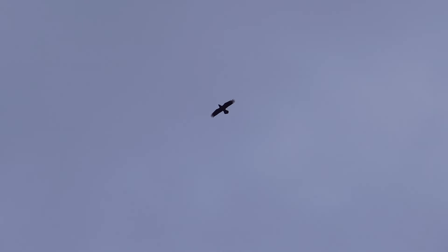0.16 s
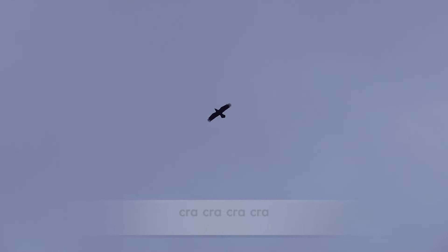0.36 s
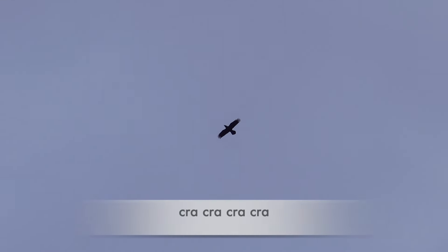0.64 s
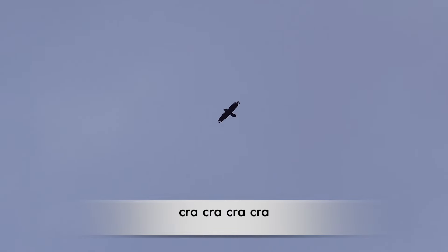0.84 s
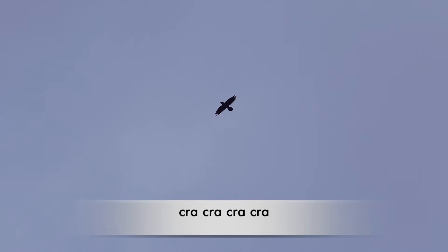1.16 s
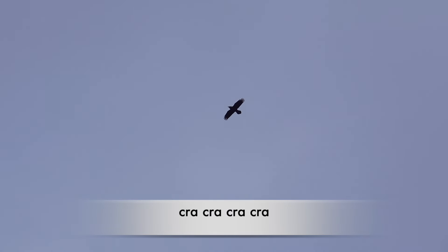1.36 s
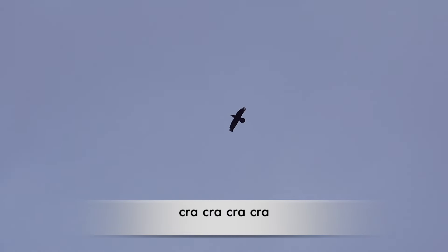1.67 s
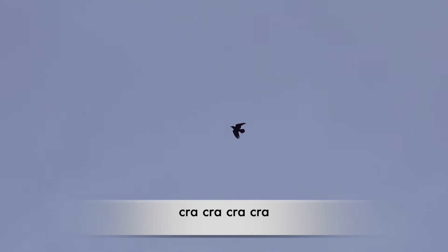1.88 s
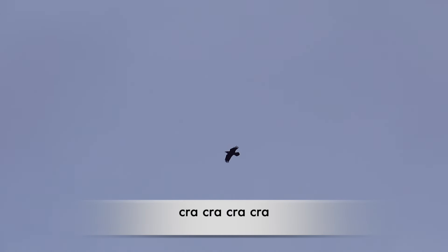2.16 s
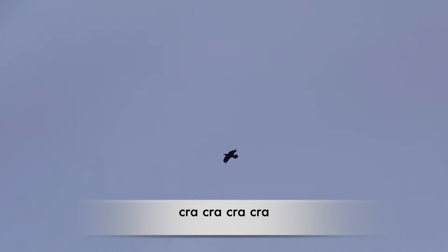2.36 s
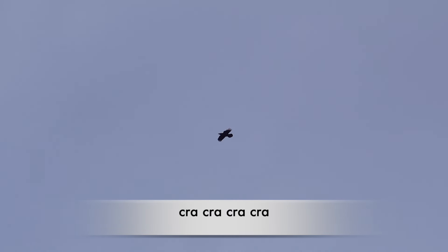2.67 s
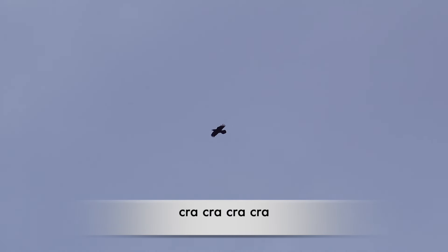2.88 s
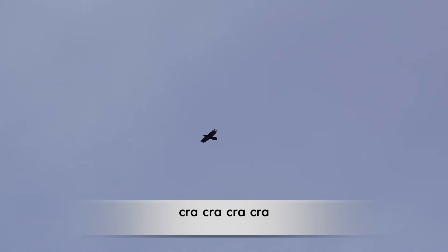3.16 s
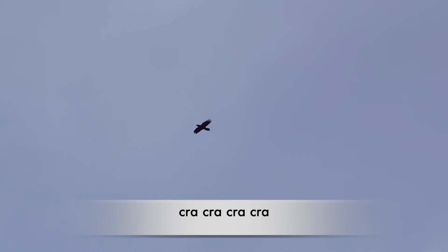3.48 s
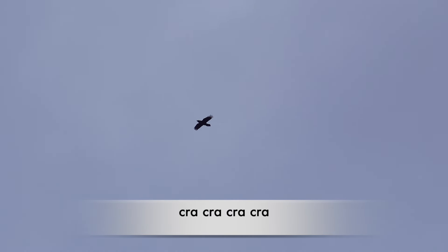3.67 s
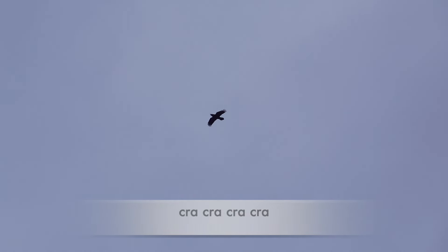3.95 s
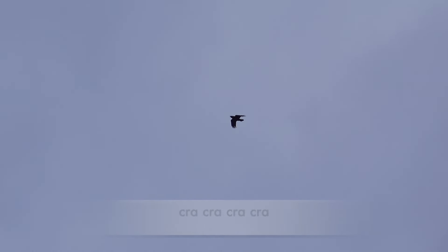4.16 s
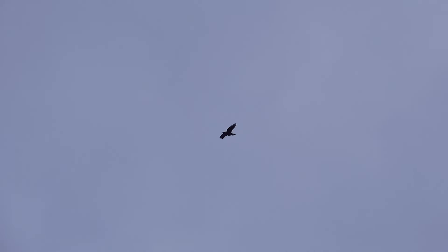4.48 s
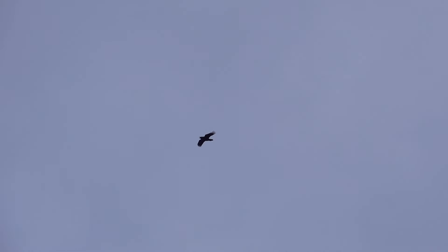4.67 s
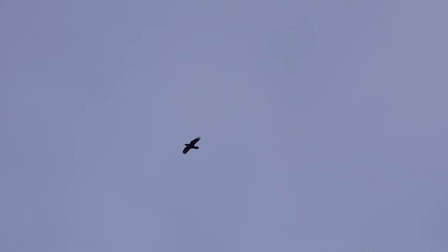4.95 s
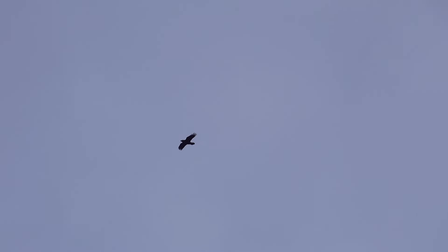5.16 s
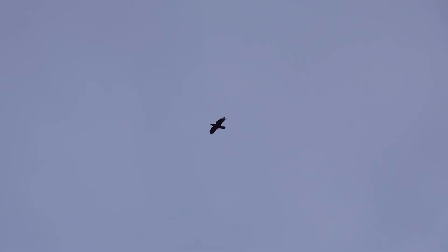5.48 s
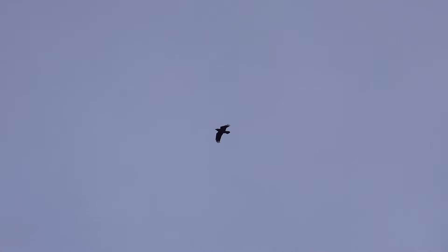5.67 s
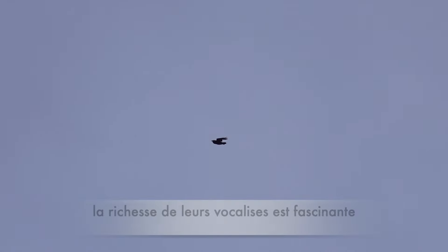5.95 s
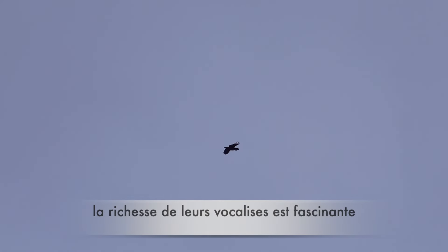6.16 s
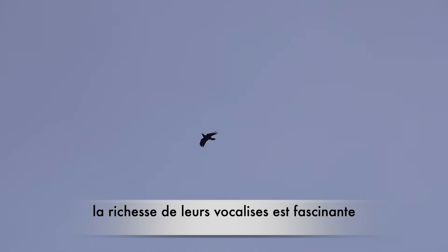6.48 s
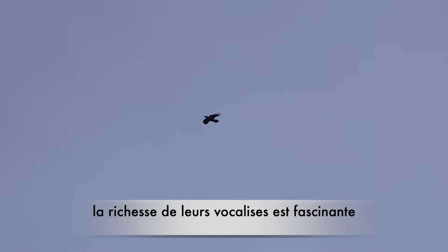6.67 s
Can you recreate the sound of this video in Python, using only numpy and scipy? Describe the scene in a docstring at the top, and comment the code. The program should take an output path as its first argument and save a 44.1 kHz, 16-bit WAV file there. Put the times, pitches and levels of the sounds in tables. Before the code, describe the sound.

Open air, handheld camera microphone, bird at some distance overhead. After a second of faint wind and dull handling thuds come four grating raven calls, each a tiny click and three rapid throbs dropping in pitch. Handling bumps and housing ticks fill the gap, with barely audible thin cries far off. Five softer, less raspy calls end the scene, the last harsher again.

```python
"""Outdoors, under a raven: two runs of short harsh calls, four and then five, each with a faint echo.
Each call is a click and three throbs of the syrinx: pulses and puffs of air pass through throat and rasp
resonances, a third harmonic whistles between throbs, and the pitch slides down at the end.
Close by, hands bump the camera (decaying low modes and dull noise) and its housing ticks (filtered bursts).
Behind lie a fading wash of distant wind, a rumble, a few thin far-off cries and a hiss, all shaped noise."""
import sys
import numpy as np
from scipy import signal
from scipy.fft import rfft, irfft, next_fast_len
from scipy.io import wavfile
from scipy.ndimage import uniform_filter1d, map_coordinates

SR = 44100
rng = np.random.default_rng(int(sys.argv[2]) if len(sys.argv) > 2 else 0)


def master(y):
    """Save y as 16-bit WAV."""
    cut = np.clip(np.atleast_2d(y).T, -1, 1)
    pcm = np.round(cut * 32767)  # scale
    wavfile.write(sys.argv[1], SR, pcm.astype(np.int16))


N = 300877  # length in samples

# The raven's calls. Each row: first throb in seconds, throb period in seconds, pitch in Hz,
# voice level in dB before a 4 dB cut, rasp level in dB before a 5 dB cut, chest gain in dB,
# open-beak gain in dB, edge gain of the rasp in dB, lead-in gain in dB, lead-in rasp gain in dB,
# swell in dB per throb, harshest moment in seconds after the first throb.
CALLS = [(1.051, .02, 427.7, -27.5, -32.5, 6, 1, -4.5, 2.5, 3.5, -2, .003),
         (1.376, .021, 433.7, -25.3, -35.5, 4, 4.5, 8.5, -9.5, -3, 1, .003),
         (1.755, 0.022, 435.7, -29, -36.5, 3.5, 1, -6.5, -9, 1.5, 0, .012),
         (2.114, 0.021, 429.3, -29.5, -35.5, 4, 3.5, 0, -12, -11.5, 0.5, .003),
         (5.159, 0.021, 423.7, -34.5, -40, -2, 2, -23, -22.5, -7, -0.5, 0.027),
         (5.467, .021, 419.4, -28, -36.5, -1, 0.5, -32, -7, -7.5, 0, 0.0134),
         (5.79, .0215, 429.8, -34.8, -41, 5.5, -3.5, -30, -3.5, 5, -0.5, .003),
         (6.142, .02, 422.6, -32, -45, -2.5, -10.5, -10.5, -14, -2, -0.5, .022),
         (6.506, 0.021, 423.6, -32.5, -33, -7.5, 4.5, 4.5, -16, -6, 2.5, 0.008)]

# One throb of the syrinx: it tightens, holds and slackens.
ATTACK_S, HOLD_S, RELEASE_S = 0.0022, 0.008, 0.006
# A slack syrinx croaks and rasps less and whistles more; the croak and rasp dips fill with each throb.
CROAK_DIP_DB, RASP_DIP_DB, WHISTLE_DIP_DB = 9, 8, 10.5
DIP_FILL_DB, WHISTLE_GROWS_DB = 4, 0.5  # per throb
# The rasp falls during each throb, and also on both sides of the call's harshest moment.
RASP_DROP_DB_PER_S, RASP_ARCH_DB_PER_S = 399, 101
# Once the last throb's period is over, croak, rasp and whistle fade.
CROAK_FADE_DB_PER_S, RASP_FADE_DB_PER_S, WHISTLE_FADE_DB_PER_S = 801, 351, 997.5
# Share of the pitch lost when slack, share lost in the closing slide, and time constant of that slide.
SAG, SLIDE, SLIDE_S = 0.145, 0.21, 0.006
WAVER, WAVER_S = 0.014, 0.012  # unsteady pitch: rms share, time between turns
# The lead-in: a click ahead of the first throb that sinks to a murmur.
LEAD_S, LEAD_RISE_DB_PER_S, LEAD_FALL_DB_PER_S = 0.0145, 8500.5, 2600.5
MURMUR_DB, LEAD_WHISTLE_DB = -17, -5.5
# The beak is widest in mid-call: time after the first throb, half width,
# and the edge of the rasp gained when wide and lost when narrow.
GAPE_AT_S, GAPE_S, WIDE_DB, NARROW_DB = 0.025, 0.029, 5.5, 4
# Faint nudges: low-mode peak at the start, its spread either way, and how it grows.
NUDGE_DB, NUDGE_SPREAD_DB, NUDGE_GROWTH_DB_PER_S = -51.5, 5.5, 0.06
NUDGE_KNOCK_DB = -10.5  # before the lift all knocks get
KNOCK_LIFT_DB = 8.5
TOP_HZ = 15750  # upper band limit of the camera


def amp(db):
    """Decibels to gain."""
    return 10 ** (np.asarray(db) / 20)


def unit(x):
    """Scaled to rms 1."""
    return x / np.sqrt(np.mean(x ** 2) + 1e-20)


def along(points, hz):
    """(Hz, value) points read on a log frequency axis."""
    f, v = np.transpose(points)
    return np.interp(np.log(hz + 1), np.log(f + 1), v)


def wobble(rate):
    """A smooth random curve, rate knots a second."""
    knots = rng.standard_normal(int(N * rate / SR) + 4)
    coarse = np.arange(0, N, 64)
    curve = map_coordinates(knots, [coarse * rate / SR])
    return np.interp(np.arange(N), coarse, curve)


def coloured(x, points):
    """x through a causal minimum-phase filter with the gain of the (Hz, dB) points."""
    n = x.shape[-1]
    m = 2 * next_fast_len(n)
    gain = amp(along(points, np.fft.rfftfreq(m, 1 / SR)))
    # folding the cepstrum onto positive times makes the filter causal
    cepstrum = irfft(np.log(gain), m)
    cepstrum[1:m // 2] *= 2
    cepstrum[m // 2 + 1:] = 0
    response = np.exp(rfft(cepstrum))
    return irfft(rfft(x, m) * response, m)[..., :n]


def noise(points):
    """Noise of rms 1 with the colour of the (Hz, dB) points."""
    m = next_fast_len(N, real=True)
    gain = amp(along(points, np.fft.rfftfreq(m, 1 / SR)))
    return unit(irfft(rfft(rng.standard_normal(m)) * gain, m)[:N])


def patchy(x, depth_db):
    """x with smooth random gains over time and frequency, scaled to rms 1."""
    z = signal.stft(x, nperseg=512)[2]
    field = rng.standard_normal(z.shape)
    field = uniform_filter1d(field, size=5, axis=0)
    field = uniform_filter1d(field, size=7, axis=1)
    return unit(signal.istft(z * amp(depth_db * unit(field)), nperseg=512)[1][:N])


def air():
    """Lumpy distant wind dies down over an uneven rumble and a hiss that is wide in the treble."""
    # Colours of the wind, the rumble and the hiss. Each row: frequency in Hz, gain in dB.
    wind_colour = [(15, -27), (30, -10), (55, -12.5), (140, -9), (300, 0.5), (550, 5.5), (750, 3.5),
                   (900, 0.5), (1020, -7), (1300, -32), (2200, -30.5), (8000, -72)]
    rumble_colour = [(20, -9), (55, -17), (90, -6.5), (145, -2), (250, -6), (500, -23), (1500, -62.5)]
    hiss_colour = [(20, 9), (150, 11), (700, 15), (1050, 22.5), (1300, 13), (2500, 5), (4000, 2.5),
                   (7000, -0.5), (11000, -1), (14000, 0.5), (15700, -2.5)]
    # Wind level. Each row: time in seconds, level in dB before a 2 dB lift.
    wind_course = [(0.0, -48.5), (0.74, -53), (0.85, -50.5), (1.56, -56), (2.55, -66), (3.84, -71.5),
                   (5.15, -70.5), (5.3, -69.5), (6.82, -70.5)]
    # Hiss level. Each row: time in seconds, level in dB before a 9 dB lift (middle) or 1.5 dB cut (sides).
    hiss_course = [(0.0, -73), (1.12, -77.5), (3.06, -81), (3.48, -82), (5.19, -83.5), (5.43, -78.5),
                   (6.82, -79.5)]
    t = np.arange(N) / SR
    wind_db = np.interp(t, *np.transpose(wind_course))
    hiss_db = np.interp(t, *np.transpose(hiss_course))
    wind = amp(wind_db + 2.0 + 0.66 * wobble(11)) * patchy(noise(wind_colour), depth_db=4.0)
    rumble = amp(-71 + 4 * wobble(25)) * noise(rumble_colour)
    hiss = amp(hiss_db + 9.0) * noise(hiss_colour)
    # white noise of opposite sign left and right
    side = amp(hiss_db - 1.5) * rng.standard_normal(N)
    return wind + rumble + hiss + np.array([side, -side])


def nudges(count=18):
    """Faint shifts of the grip, loosely spread in time: rows like those of the firm bumps."""
    chance = rng.random((count, 2))
    times = (np.arange(count) + chance[:, 0]) / count * (N / SR - 0.1) + 0.05
    levels = NUDGE_DB + NUDGE_GROWTH_DB_PER_S * times + NUDGE_SPREAD_DB * (2 * chance[:, 1] - 1)
    return [(s, db, NUDGE_KNOCK_DB) for s, db in zip(times, levels)]


def bumps():
    """Soft pushes of the hand swell in the camera body's low modes, with a dull rubbing knock."""
    # Firm bumps. Each row: time in seconds (onset 6 ms earlier), low-mode peak in dB,
    # knock relative to it in dB before the knock lift.
    firm = [(0.445, -39, -10.5), (0.817, -44.5, -14), (1.548, -36.5, -8), (1.595, -43, -5.5),
            (1.995, -42, -13.5), (2.055, -43.5, -10.5), (2.201, -45, -14), (2.389, -44, -15),
            (2.477, -39, -14.5), (2.654, -42.5, -7.5), (2.843, -35, -13), (3.025, -36, -10.5),
            (3.574, -39.5, -20), (3.628, -46.5, -19.5), (3.751, -42.5, -18), (3.795, -43, -21),
            (3.914, -41.5, -11), (4.243, -45.5, -25.5), (4.458, -50.5, -13.5), (4.705, -48, -16),
            (5.172, -41, -8.5), (5.24, -51.5, 2), (5.336, -40, -9), (5.934, -47, -19), (6.121, -48.5, -9.5),
            (6.302, -52.5, -13)]
    # Modes of the camera body. Each row: frequency in Hz, 60 dB decay time in seconds, level in dB.
    body_modes = [(143.2, 0.12, 1.5), (86, 0.089, -9)]
    # Colour of the knock. Each row: frequency in Hz, gain in dB.
    knock_colour = [(20, -12.5), (60, -14), (120, -10), (220, 3), (320, -6), (600, -27.5), (1500, -32),
                    (4000, -60.5)]
    out = np.zeros(N + SR)
    t = np.arange(SR // 7) / SR
    swell = 1 - np.exp(-(t / 0.012) ** 2)
    for s, db, knock_db in list(firm) + nudges():
        ring = np.zeros(len(t))
        for hz, t60, level_db in body_modes:
            detuned_hz = hz * rng.normal(1, 0.0053)
            ring += amp(level_db - 60 * t / t60) * np.sin(2 * np.pi * (detuned_hz * t + rng.random()))
        ring *= swell
        knock = coloured(rng.standard_normal(len(t)) * swell * amp(-60 * t / 0.1), knock_colour)
        ring /= np.abs(ring).max()
        knock *= amp(knock_db + KNOCK_LIFT_DB) / np.abs(knock).max()
        out[round((s - 0.006) * SR):][:len(t)] += amp(db) * (ring + knock)
    return out[:N]


def lead_in(t):
    """Gains of the opening click and of the soft whistle that bridges to the first throb."""
    since = t + LEAD_S
    gate = amp(LEAD_RISE_DB_PER_S * np.minimum(since, 0)) * (t < 0)
    sinking_db = np.maximum(-LEAD_FALL_DB_PER_S * np.maximum(since, 0), MURMUR_DB)
    return gate * amp(sinking_db), gate * amp(LEAD_WHISTLE_DB)


def effort(t, period, count=3):
    """Throb number, its age, tightness of the syrinx (0-1), and time since the last throb's period."""
    number = np.clip(np.floor((t + ATTACK_S) / period), 0, count - 1)
    age = t - number * period
    tight = np.interp(age, [-ATTACK_S, 0, HOLD_S, HOLD_S + RELEASE_S], [0, 1, 1, 0])
    return number, np.maximum(age, 0), tight, np.maximum(t - count * period, 0)


def waver(t):
    """A small random drift of the pitch, as a factor."""
    turn = (t - t[0]) / WAVER_S
    knots = rng.standard_normal(size=64)
    return 1 + WAVER * np.interp(turn, np.arange(len(knots)), knots)


def pulses(phase, jitter, scatter_db):
    """One sharp pulse per cycle of phase, each a little off in time and size."""
    cycles = np.arange(1, int(phase[-1]))
    chance = rng.standard_normal((len(cycles), 2))
    at = np.interp(cycles + jitter * chance[:, 0], phase, np.arange(len(phase)))
    # a windowed sinc places each pulse between samples
    taps = np.floor(at)[:, None] + np.arange(-7, 9)
    offset = taps - at[:, None]
    shape = np.sinc(offset) * np.cos(np.pi * offset / 16) ** 2
    sized = shape * amp(scatter_db * chance[:, 1:])
    index = np.clip(taps, 0, len(phase) - 1).astype(int)
    return np.bincount(index.ravel(), sized.ravel(), len(phase))


def scattered(x):
    """Things near the camera smear short waves over a few milliseconds."""
    t = np.arange(SR // 100) / SR
    spray = rng.standard_normal(len(t)) * np.exp(-t / 0.002)
    return x + 0.6 * signal.fftconvolve(x, spray / np.linalg.norm(spray))[:len(x)]


def caw(t, period, pitch_hz, level_db, rasp_db, chest_db, beak_db, edge_db,
        lead_db, lead_rasp_db, swell_db, harshest_s):
    """Throbs are high and harsh; between them the pitch sags and the third harmonic whistles through."""
    # Lower throat and upper rasp resonances. Each row: frequency in Hz, gain in dB.
    throat_colour = [(150, -53), (300, -19.5), (420, -20.5), (600, -19), (740, -16), (870, -5.5),
                     (990, -2.5), (1120, -1.5), (1290, -10.5), (1480, -10), (1700, -11), (1900, -23),
                     (2300, -32.5), (3200, -64.5)]
    rasp_colour = [(1500, -48), (2000, -9), (2300, -14), (2590, 0.5), (2780, -6.5), (3000, -1.5),
                   (3200, -5), (3450, 1), (3850, -5), (4300, -13.5), (5000, -29.5), (5700, -37),
                   (7000, -58), (10000, -81.5)]
    number, age, tight, after = effort(t, period)
    slack = 1 - tight
    click, bridge = lead_in(t)

    # gains of the croak, the rasp and the whistle
    swell = amp(swell_db * (number - 0.5)) * (t > -ATTACK_S)
    force = swell * amp(slack * (DIP_FILL_DB * number - CROAK_DIP_DB) - CROAK_FADE_DB_PER_S * after)
    waning_db = RASP_DROP_DB_PER_S * age + RASP_FADE_DB_PER_S * after
    waning_db += RASP_ARCH_DB_PER_S * np.abs(t - harshest_s)
    harsh = swell * amp(slack * (DIP_FILL_DB * number - RASP_DIP_DB) - waning_db)
    whistle_db = WHISTLE_GROWS_DB * number - WHISTLE_DIP_DB * tight - WHISTLE_FADE_DB_PER_S * after
    whistle = swell * (t > 0) * amp(whistle_db)

    slide = SLIDE * (1 - np.exp(-after / SLIDE_S))
    phase = np.cumsum(pitch_hz * waver(t) * (1 - SAG * slack - slide)) / SR
    beats = unit(pulses(phase, jitter=0.014, scatter_db=2))
    # air rushes through once in each cycle
    puffs = unit(rng.standard_normal(len(t)) * (1 + np.cos(2 * np.pi * phase)))

    croak = coloured((beats + 0.28 * puffs) * (force + amp(lead_db) * click), throat_colour)
    tone = np.cos(2 * np.pi * 3 * phase) * (whistle + amp(min(lead_db, 0)) * bridge)
    # a wider beak lets out more above the main resonance
    mouth = [(450, chest_db), (800, -1), (1250, 1.5), (1650, beak_db), (2200, beak_db), (5000, -42.5)]
    voice = coloured(unit(croak) + amp(-8) * unit(tone), mouth)

    # the rasp falls apart into noise towards the end of the call
    noisy = np.interp(t / period, [2, 3], [0.7, 1.2])
    rasp = coloured((beats + noisy * puffs) * (harsh + amp(lead_rasp_db) * click), rasp_colour)
    # the opening beak crossfades from a narrow to a wide filter and back
    gape = np.exp(-((t - GAPE_AT_S) / GAPE_S) ** 2)
    shaped = np.zeros(len(t))
    for share, more_db in [(gape, WIDE_DB), (1 - gape, -NARROW_DB)]:
        opening = [(2400, beak_db), (3100, -0.019), (3700, -0.33), (5000, edge_db + more_db)]
        shaped += coloured(rasp * share, opening)
    return amp(level_db - 4.0) * unit(voice) + amp(rasp_db - 5.0) * unit(scattered(shaped))


def raven():
    """All the calls, each starting with its lead-in click just before the first throb."""
    out = np.zeros(N)
    early = SR // 40
    t = (np.arange(SR // 5) - early) / SR
    for s, *call in CALLS:
        out[round(s * SR) - early:][:len(t)] += caw(t, *call)
    return out


def echo(x):
    """Ground and trees scatter a faint tail, drawn afresh for each call."""
    # Decay of the echo. Each row: frequency in Hz, 60 dB decay time in seconds.
    decay = [(200, 0.13), (1200, 0.21), (3500, 0.36), (8000, 0.23)]
    out = np.zeros(N + SR)
    for s, *_ in CALLS:
        start = round(s * SR) - SR // 40
        hz, t, z = signal.stft(rng.standard_normal(SR // 2), SR, nperseg=256)
        # the tail builds up over some 14 ms and dies away at its own rate in each band
        envelope = amp(-60 * t / along(decay, hz)[:, None]) * (1 - np.exp(-t / 0.014))
        tail = signal.istft(z * envelope, SR, nperseg=256)[1]
        answer = signal.fftconvolve(x[start:start + SR // 5], tail / np.linalg.norm(tail))
        out[start:start + len(answer)] += answer
    return out[:N]


def ticks():
    """Small dry clicks of the housing: noise bursts with a fast decay and a weak slower one."""
    # Ticks of the camera housing. Each row: start in seconds, peak in dB before a 2 dB lift.
    tick_rows = [(1.5923, -64), (2.4841, -64.5), (2.6547, -50.5), (2.831, -59.5), (3.019, -42),
                 (3.1961, -65), (3.9144, -44), (4.6165, -64)]
    # Colour of a tick in the housing. Each row: frequency in Hz, gain in dB.
    housing_colour = [(200, -21), (400, 3.5), (900, 0.5), (1400, -9.5), (2100, 7), (2700, -18), (3050, 9.5),
                      (3400, 7.5), (3850, -30), (6000, -37.5)]
    out = np.zeros(N)
    t = np.arange(SR // 10) / SR
    envelope = amp(-60 * t / 0.015) + amp(-19 - 60 * t / 0.14)
    for s, db in tick_rows:
        click = coloured(rng.standard_normal(len(t)) * envelope, housing_colour)
        out[round(s * SR):][:len(t)] += amp(db + 2.0) * click / np.abs(click).max()
    return out


def cries():
    """Something far away calls thinly, blurred to a narrow band of noise."""
    # Far-off cries. Each row: middle in seconds, half length in seconds, pitch in Hz, level in dB.
    cry_rows = [(3.11, .06, 2430, -75), (3.421, 0.057, 2380, -70), (5.335, 0.039, 2130, -74.5)]
    t = np.arange(N) / SR
    out = np.zeros(N)
    for s, half, hz, db in cry_rows:
        band = [(hz / 2, -40), (hz * 0.75, -9), (hz, 0), (hz * 1.111, -14), (hz * 2, -70)]
        out += amp(db) * np.exp(-((t - s) / half) ** 2) * noise(band)
    return out


def scene():
    """The bird and the handling sit in the centre; the long way through the air dulls the echo."""
    # Colour of the echo. Each row: frequency in Hz, gain in dB.
    far_colour = [(400, 8), (850, 3.5), (1120, 2), (1600, 2.5), (2100, -0.5), (2700, -7), (3700, -7),
                  (7000, -6.5)]
    bird = raven()
    distant = amp(-18.0) * coloured(echo(bird), far_colour)
    return bird + distant + bumps() + ticks() + cries() + air()


def record(dry):
    """The camera keeps nothing above its band limit."""
    m = next_fast_len(N + SR // 2)
    kept = np.fft.rfftfreq(m, 1 / SR) < TOP_HZ
    return irfft(rfft(dry, m) * kept, m)[..., :N]


dry = scene()
out = record(dry)
master(out)
```